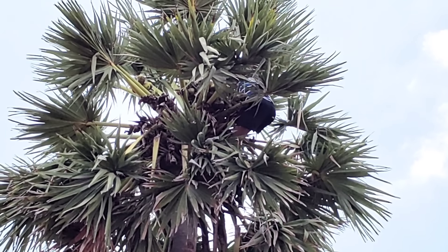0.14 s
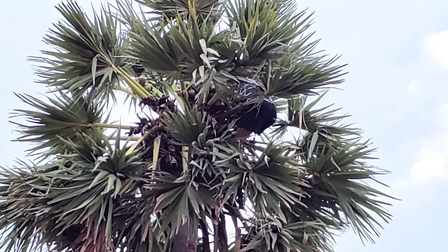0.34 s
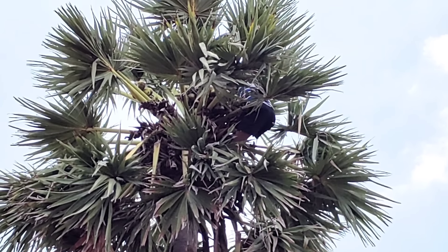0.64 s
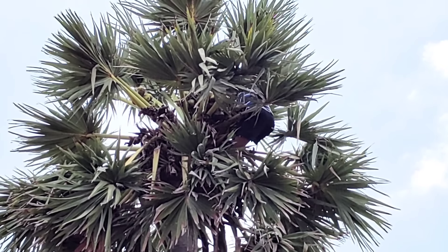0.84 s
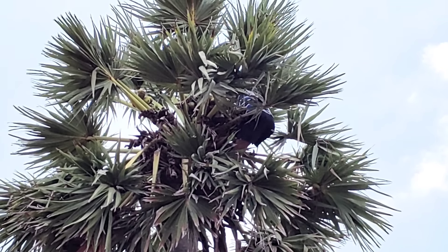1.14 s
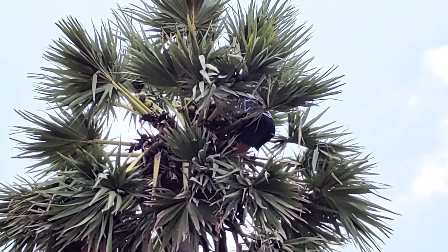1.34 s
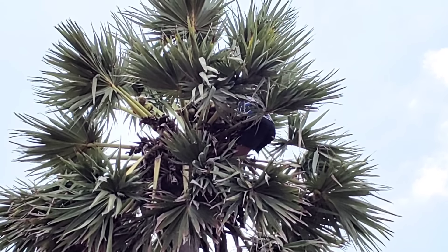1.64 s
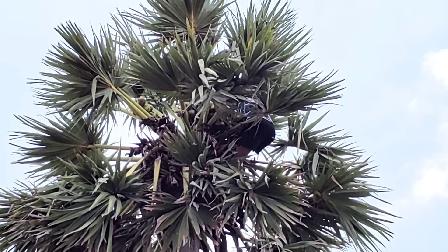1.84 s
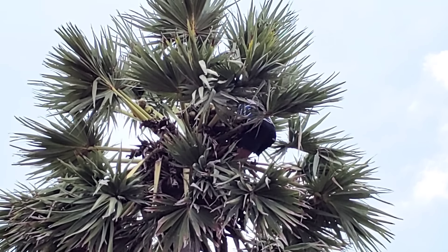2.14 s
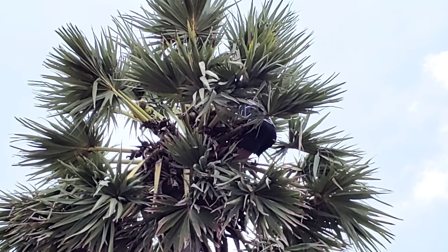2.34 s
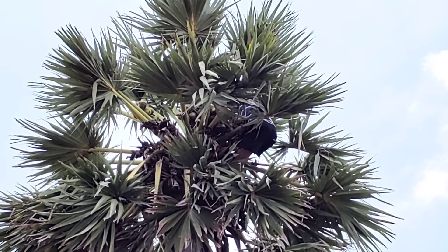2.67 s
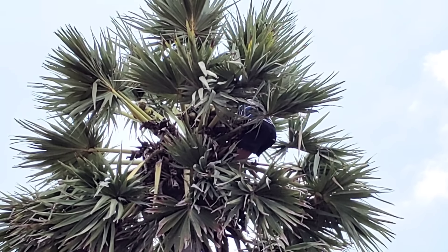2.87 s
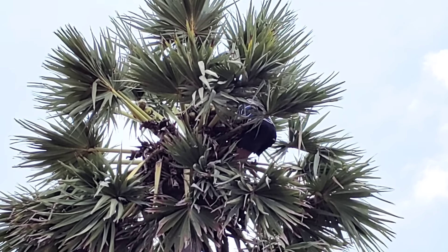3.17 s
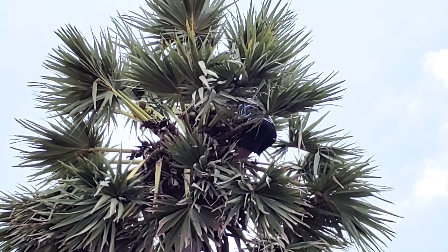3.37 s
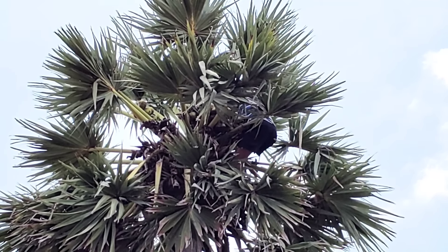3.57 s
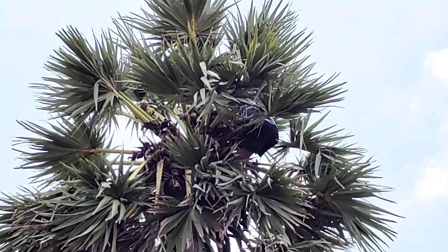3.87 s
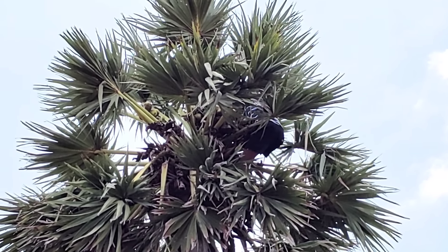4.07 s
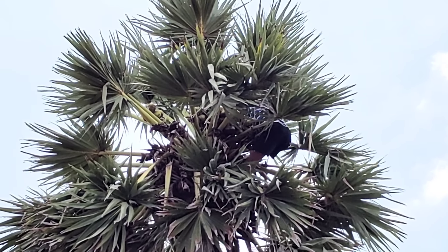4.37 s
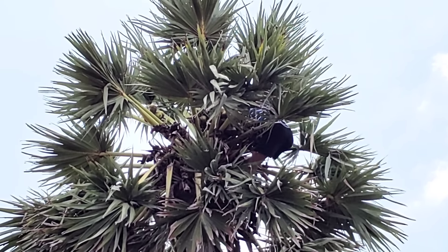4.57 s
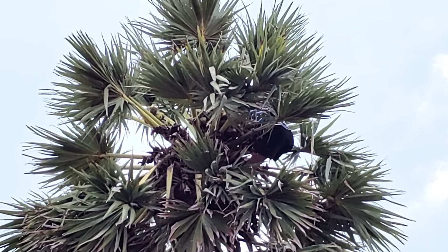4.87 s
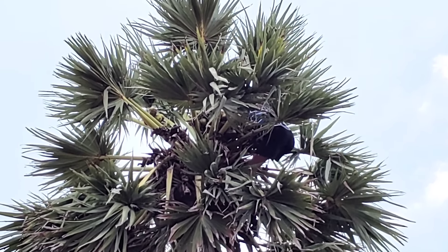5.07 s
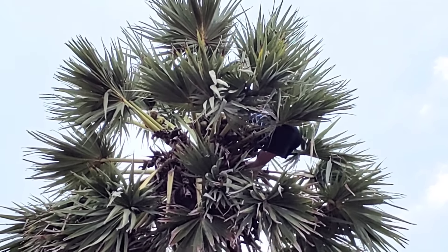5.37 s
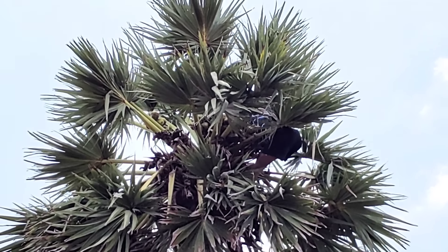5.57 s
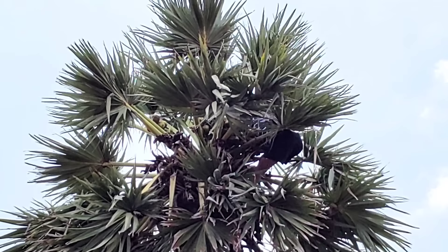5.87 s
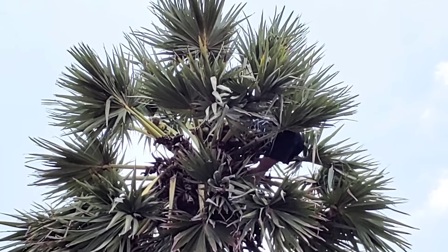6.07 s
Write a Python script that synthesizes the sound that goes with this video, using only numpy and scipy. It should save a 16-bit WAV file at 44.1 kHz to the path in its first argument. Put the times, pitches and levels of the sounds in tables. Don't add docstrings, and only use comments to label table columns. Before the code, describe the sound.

Outdoors, stiff palm leaves snap and hollow stalks knock over a faint fading breeze and hiss, ending in a loud, crackling leaf thrash.

```python
import sys
import numpy as np
from scipy import signal
from scipy.fft import rfft, irfft
from scipy.io import wavfile
from scipy.ndimage import uniform_filter1d

SR = 44100
rng = np.random.default_rng(int(sys.argv[2]) if len(sys.argv) > 2 else 0)


def elevation(decibels):
    levels = np.asarray(decibels, float)
    return 10 ** (levels / 20)


def store_wav(level_fs):
    pcm = np.round(np.clip(np.atleast_2d(level_fs), -1, 1) * 32767)
    wavfile.write(sys.argv[1], SR, pcm.T.astype(np.int16))


N = 273861
HZ = np.arange(N // 2 + 1) * SR / N


def band(x, lo_hz, hi_hz):
    return signal.sosfilt(signal.butter(2, [lo_hz, min(hi_hz, .45 * SR)], "band", fs=SR, output="sos"), x)


def unit(x):
    return x / np.sqrt(np.mean(x ** 2))


def along(table, hz):
    points_hz, values = np.array(table)[:, 0], np.array(table)[:, 1]
    return np.interp(np.log(hz + 1), np.log(points_hz), values)


def curves(table):
    s, *columns = np.transpose(table)
    return [np.interp(np.arange(N) / SR, s, column) for column in columns]


def walk(rate):
    hold = int(SR / rate)
    steps = np.repeat(rng.standard_normal(N // hold + 1), hold)
    return 1.3 * uniform_filter1d(uniform_filter1d(steps, hold), hold)[:N]


def sides(pan_db):
    return elevation(np.array([pan_db, -pan_db]) / 2)


def add(out, s, x):
    i = int(s * SR)
    out[:, i:i + x.shape[1]] += x[:, :N - i]


def split(spectrum, low_hz, high_hz):
    low = 1 / (1 + (HZ / low_hz) ** 4)
    high = 1 - 1 / (1 + (HZ / high_hz) ** 12)
    return [irfft(spectrum * share, N) for share in (low, 1 - low - high, high)]


def patchy(x, depth_db, count_hz, count_s):
    spectra = signal.stft(x, nperseg=256)[2]
    chance = rng.standard_normal(spectra.shape[1:])
    chance = uniform_filter1d(chance, size=count_hz, axis=0)
    chance = unit(uniform_filter1d(chance, size=count_s, axis=1))
    chance[:3] *= .3
    return signal.istft(spectra * elevation(depth_db * chance), nperseg=256)[1][:, :N]


# pitch_hz, level_db (per Hz)
BACKGROUND_COLOUR = [(18, -37), (30, -19), (108, -1.5), (270, -3.5), (379, -10), (709, -11.5), (1500, -17),
                     (3780, -21.5), (4910, -28), (6540, -26.5), (8000, -35.5), (10150, -38), (10600, -24.5),
                     (15500, -23)]
# time_s, level_db (over calm)
BREEZE_LEVEL = [(0, 4.5), (.65, 4.5), (.9, 4), (1.1, 0.5), (1.5, 2), (2, -1), (2.5, 3), (2.9, -1),
                (3.9, -1), (4.4, 1.5), (5, -1.5)]
AIR_DB = -68.5
HUM_DB, HUM_SHARE, HISS_SHARE = 1, .7, 0.49
SETTLE_DB, SETTLE_S = 6, 0.29


def air():
    noise = irfft(elevation(along(BACKGROUND_COLOUR, HZ)) * rfft(rng.standard_normal((2, N))), N)
    hum, far, hiss = split(rfft(unit(noise)), 470, 6500)
    breeze_db = curves(BREEZE_LEVEL)[0]
    settle_db = SETTLE_DB * np.exp(-np.arange(N) / SR / SETTLE_S)
    still = elevation(HUM_DB + HUM_SHARE * breeze_db) * hum
    still += elevation(breeze_db) * far
    still += elevation(HISS_SHARE * breeze_db + settle_db) * hiss
    return elevation(AIR_DB + 4.5) * patchy(still, depth_db=2.44, count_hz=5, count_s=16)


# time_s, level_db
TRILL_LEVEL = [
    (0.0, -59),
    (0.008, -60),
    (0.042, -70.5),
    (0.066, -63),
    (0.1, -79),
]
# pitch_hz, width_hz, level_db
TRILL_THROAT = [(7140, 386, -1.5), (4330, 410, -12), (6000, 410, -11.5), (8050, 1000, -12)]
TRILL_HZ = 117


def trill(duty=0.97):
    phase = np.cumsum(TRILL_HZ * (1 + 0.073 * walk(40))) / SR % 1
    breath = rng.standard_normal(N) + 2.0 * rng.standard_normal((2, N))
    puffs = np.exp(-phase / duty) * breath
    buzz = unit(sum(elevation(db) * band(puffs, hz - w / 2, hz + w / 2) for hz, w, db in TRILL_THROAT))
    sounding = np.arange(N) < TRILL_LEVEL[-1][0] * SR
    return buzz * elevation(curves(TRILL_LEVEL)[0] + 6) * sides(7.3)[:, None] * sounding


HOLD_S, FALL_BEND = .025, 1.4
SWELL_DB_PER_KHZ, FADE_DB = 9, 15
LEFT_HZ, COMB_HZ, COMB_PAN_DB = 6250, 1020, 12
THROAT_HZ, THROAT_WIDTH_HZ, THROAT_DB = 6310, 130, 6


def whistle(notes, lag_s, comb_db, rough_db=2.1):
    out = np.zeros((2, N))
    for s, fall_s, first_hz, last_hz, db in notes:
        t = np.arange(int((fall_s + HOLD_S) * SR)) / SR
        above = (first_hz - last_hz) * np.maximum(1 - t / fall_s, 0) ** FALL_BEND
        hz = last_hz + above
        level_db = db - SWELL_DB_PER_KHZ * above / 1000
        level_db -= FADE_DB * np.maximum(t - fall_s, 0) / HOLD_S
        level_db += THROAT_DB * np.exp(-((hz - THROAT_HZ) / THROAT_WIDTH_HZ) ** 2)
        level_db += rough_db * walk(163)[:len(t)]
        phase = 2 * np.pi * (np.cumsum(hz) / SR - np.outer([0, lag_s], hz))
        comb = np.tanh(2 * np.cos(2 * np.pi * (hz - LEFT_HZ) / COMB_HZ))
        gain = np.sqrt(2) * elevation(level_db) * signal.windows.tukey(len(t), .15)
        add(out, s, gain * sides(comb_db * comb) * np.sin(phase))
    return out


# start_s, fall_s, first_hz, last_hz, peak_db
NEAR_WHISTLES = [
    (1.397, .066, 7350, 6230, -61.5),
    (1.602, .05, 6200, 5440, -70),
    (4.031, .074, 7120, 6330, -62.5),
    (4.243, .052, 5920, 5230, -69),
]
# start_s, fall_s, first_hz, last_hz, peak_db
FAR_WHISTLES = [
    (2.415, .115, 3050, 3045, -83),
    (2.592, .06, 3510, 3495, -82),
]


def birds(echo_db=-12.0, echo_t60=0.85):
    song = whistle(NEAR_WHISTLES, 1.155e-3, COMB_PAN_DB)
    song += whistle(FAR_WHISTLES, 2e-5, comb_db=-10.0) + trill()
    t = np.arange(SR // 2) / SR
    scatter = rng.standard_normal((2, len(t))) * elevation(-60 * t / echo_t60) * (t > .03)
    scatter /= np.sqrt(np.sum(scatter ** 2) / 2)
    flutter = walk(900)
    return song + elevation(echo_db) * flutter * signal.fftconvolve(song, scatter, axes=1)[:, :N]


def snaps(per_s=9000, scatter_db=.6, smear=1.6):
    hits = rng.random(N) < per_s / SR
    clicks = hits * rng.standard_normal(N) * elevation(scatter_db * rng.exponential(size=N))
    return unit(clicks) + smear * rng.standard_normal(N)


# pitch_hz, level_db (per Hz)
SNAP_COLOUR = [(24, -53), (45, -9), (103, -6), (400, -11.5), (522, -8), (1020, -6.5), (2270, -5),
               (5000, -7), (8200, -8), (9500, -12.5), (10050, -14.5), (10450, -8.5), (12000, -4.5),
               (15500, -16)]
# pitch_hz, width_hz, level_db
LEAF_RINGS = [(1020, 81, -2), (1449, 30, 2.5), (2292, 130, -0.5), (2785, 77, -6.5), (2940, 8.3, -31),
              (3610, 300, -11.5), (4508, 80, -6), (4870, 51, -72), (6237, 31, -6.5)]
# pitch_hz, likeness (-1 to 1, no unit)
LEAF_LIKENESS = [(60, -0.22), (150, 0.37), (300, 0.98), (900, 0.91), (1400, 0.15), (3000, 0.39),
                 (5500, 0.099), (7000, -0.23), (15000, -0.36)]


def leaf_grain(modes_db=5):
    ring = sum(elevation(db) / (1 + (2 * (HZ - f) / w) ** 2) for f, w, db in LEAF_RINGS)
    colour = elevation(along(SNAP_COLOUR, HZ)) * (1 + elevation(modes_db) * ring)
    alike = np.clip(along(LEAF_LIKENESS, HZ), -1, 1)
    mid = rfft(snaps()) * np.sqrt(1 + alike)
    side = rfft(snaps()) * np.sqrt(1 - alike)
    return colour * np.array([mid + side, mid - side])


RINGING_TREBLE_DB, CRISP_RING_HZ, CRISP_RING_DB = -19, 1050, -16


def kinds(ringing, crisp):
    rows = [(s, db, hz, ring_db, RINGING_TREBLE_DB, t60) for s, db, hz, ring_db, t60 in ringing]
    return rows + [(s, db, CRISP_RING_HZ, CRISP_RING_DB, treble_db, t60) for s, db, treble_db, t60 in crisp]


def cracks(table, body, treble, rise_s, crest_db, ring_q, hold, tick_db):
    out, t = np.zeros((2, N)), np.arange(SR // 3) / SR
    tick = 1 + elevation(tick_db - 60 * t / 0.016)
    for s, db, hz, ring_db, treble_db, t60 in table:
        i = int(s * SR)
        n = min(len(t), N - i)
        fade_db = 60 * (t / max(t60, .004)) ** hold
        shape = ((1 - np.exp(-t / rise_s)) * elevation(db - crest_db - fade_db))[:n]
        burst = body[:, i:i + n]
        patch = unit(band(burst, hz * (1 - .5 / ring_q), hz * (1 + .5 / ring_q)))
        bright = elevation(treble_db) * tick[:n] * treble[:, i:i + n]
        out[:, i:i + n] += shape * (burst + elevation(ring_db) * patch + bright)
    return out


EFFORT_DB = -38


def follow(effort_db, db, lag_s, power):
    keep = np.exp(-1 / (max(lag_s, .001) * SR))
    late = signal.lfilter([1 - keep], [1, -keep], elevation(effort_db - EFFORT_DB))
    return elevation(EFFORT_DB + db) * late ** power


# start_s, length_s, level_db
STALK_JOLTS = [
    (5.084, 0.031, -62),
    (5.234, 0.046, -56),
    (5.323, 0.074, -54),
    (5.693, .05, -56),
    (5.756, 0.027, -58),
    (6.025, 0.07, -48),
    (6.085, 0.082, -40.5),
    (6.148, 0.067, -43.5),
]


def jolts():
    out = np.zeros((1, N))
    for s, length_s, db in STALK_JOLTS:
        add(out, s, elevation(db) * signal.windows.tukey(int(length_s * SR), .7)[None])
    return out


# time_s, level_db
PULL_EFFORT = [
    [(5.0, -71.5), (5.1, -62), (5.108, -43), (5.182, -43), (5.188, -34), (5.31, -39), (5.33, -33.5),
     (5.392, -34), (5.418, -41)],
    [(5.532, -43.5), (5.54, -40.5), (5.68, -41), (5.79, -49), (5.93, -50.5)],
    [(6.01, -37), (6.08, -31), (6.126, -28), (6.15, -34), (6.21, -33.5)],
]
# start_s, peak_db, ring_hz, ring_db, t60_s
RINGING_CRACKS = [(0.001, -65, 4320, 4, 0.085), (0.108, -45, 1115, -1.5, 0.069),
                  (0.227, -54.5, 1420, -2, 0.074), (0.509, -63, 1050, 0, 0.032), (0.62, -60, 840, 5, 0.06),
                  (0.659, -56, 1000, 3, 0.044), (0.69, -64.5, 1020, 6, 0.12), (1.144, -66, 736, 12, 0.026),
                  (1.277, -68, 1070, 12, 0.031), (2.163, -64, 890, -2, 0.04), (3.769, -61, 960, 3, 0.05),
                  (3.968, -62, 840, 0, 0.027), (4.544, -61.5, 736, 5, 0.089), (4.561, -51, 980, -7, 0.086)]
# start_s, peak_db, treble_db, t60_s
CRISP_CRACKS = [
    (0.14, -44.5, -0.5, 0.081),
    (0.486, -55, -2.5, 0.033),
    (0.733, -59.5, -1, 0.044),
    (0.896, -48.5, -18, 0.034),
    (1.319, -59, -19, 0.14),
    (2.368, -64, -30, 0.058),
    (4.071, -57.5, -33, 0.19),
    (4.664, -48, -8, 0.11),
    (4.719, -56.5, -16, 0.165),
]
# start_s, peak_db, ring_hz, ring_db, t60_s
RINGING_THRASHES = [(5.062, -50, 1000, -3, 0.067), (5.083, -36.5, 1000, -2, 0.039),
                    (5.107, -34.5, 1120, -1, 0.048), (5.186, -32, 2730, 4, 0.053),
                    (5.272, -29, 940, 1.5, 0.059), (5.327, -25.5, 4400, 1.5, 0.052),
                    (5.383, -50, 950, 9, 0.36), (5.46, -44.5, 590, 13, 0.08), (5.539, -30, 990, -13, 0.056),
                    (5.627, -35.5, 1040, 1, 0.042), (5.903, -32, 1010, -4, 0.035),
                    (5.942, -48.5, 3900, 17, 0.04), (6.124, -22, 1020, -5, 0.15)]
# start_s, peak_db, treble_db, t60_s
CRISP_THRASHES = [
    (5.223, -28.5, -18, 0.15),
    (5.254, -42.5, -21, 0.06),
    (5.364, -25.5, 3.5, 0.038),
    (6.015, -28, -15, 0.082),
    (6.084, -22.5, -1.5, 0.043),
    (6.114, -17.5, -2.5, 0.043),
    (6.176, -22.5, -11, 0.073),
]
TIPS_DB, TIPS_LAG_S, TIPS_POWER = -7.5, 0.01, 1.47
STALK_DB, STALK_LAG_S, STALK_POWER = -16.5, 0.031, 0.51


def fronds():
    stalk, body, treble = map(unit, split(leaf_grain(), 490, 8260))
    before_pulls = np.arange(N) < PULL_EFFORT[0][0][0] * SR
    effort_db = curves(sum(PULL_EFFORT, []))[0] - 200 * before_pulls
    slips = elevation(1.22 * walk(60) + 0.51 * walk(350))
    drag = elevation(effort_db) * body
    drag += follow(effort_db, TIPS_DB, TIPS_LAG_S, TIPS_POWER) * treble
    sway = follow(effort_db, STALK_DB, STALK_LAG_S, STALK_POWER) * elevation(1.6 * walk(16))
    drag += (sway + jolts()) * stalk
    small = cracks(kinds(RINGING_CRACKS, CRISP_CRACKS), body, treble,
                   rise_s=.001, crest_db=11.5, ring_q=6, hold=2.2, tick_db=15)
    large = cracks(kinds(RINGING_THRASHES, CRISP_THRASHES), body, treble,
                   rise_s=.0007, crest_db=13, ring_q=4, hold=1.8, tick_db=0)
    return patchy(slips * drag + small + large, depth_db=2.0, count_hz=3, count_s=5)


def knock(table, rise_s, over, over_db):
    out, t = np.zeros((2, N)), np.arange(SR // 3) / SR
    for s, db, hz, t60, pan_db in table:
        fade = elevation(-60 * t / max(t60, .01))
        tone = np.sin(2 * np.pi * hz * t)
        tone += elevation(over_db) * fade * np.sin(2 * np.pi * over * hz * t)
        add(out, s, np.outer(sides(pan_db), elevation(db) * (1 - np.exp(-t / rise_s)) * fade * tone))
    return out


# start_s, peak_db, pitch_hz, t60_s, left_minus_right_db
RIB_TOCKS = [
    (.143, -43, 1140, .075, 3),
    (.228, -55, 1430, .06, 0),
]
# start_s, peak_db, pitch_hz, t60_s, left_minus_right_db
STALK_KNOCKS = [(0.73, -50.5, 307, 0.14, 1), (2.521, -37, 281, 0.043, -1), (2.527, -45, 259, 0.085, -2),
                (2.572, -45, 123, 0.058, 2), (2.598, -51, 263, 0.054, 3), (3.654, -47.5, 151, 0.06, 3),
                (3.699, -45, 134, 0.05, 9), (3.727, -45.5, 137, 0.081, 0), (3.757, -49, 118, 0.079, 3),
                (4.688, -64, 210, 0.084, 4), (4.717, -54, 111, 0.11, 10), (4.739, -53, 104, 0.045, 27)]
# start_s, peak_db, pitch_hz, t60_s, left_minus_right_db
FIBRE_THUDS = [
    (2.158, -48, 456, 0.078, -1.5),
    (2.165, -45, 600, 0.064, 8),
    (2.179, -56, 430, 0.091, 9),
    (2.212, -53, 454, 0.062, 0.5),
    (2.227, -60, 600, 0.05, -1.5),
]
# start_s, peak_db, left_minus_right_db
BLADE_TICK = [
    (2.5634, -42.5, 13.5),
]
# pitch_hz, level_db, t60_s
BLADE_TONES = [(2800, 6.5, 0.014), (1200, -8.5, 0.027), (1440, -6, 0.02), (1900, -17, .025)]


def stalks(rough=.4):
    hollow = knock(STALK_KNOCKS, rise_s=0.0029, over=1.68, over_db=-5) * (1 + rough * walk(280))
    hollow += knock(FIBRE_THUDS, rise_s=.002, over=1.9, over_db=-4) * (.6 + .6 * walk(1100))
    out = band(hollow, 75, 2500) + knock(RIB_TOCKS, rise_s=0.0047, over=2.8, over_db=-25)
    t = np.arange(SR // 3) / SR
    for s, db, pan_db in BLADE_TICK:
        tick = sum(elevation(g - 60 * t / t60) * np.sin(2 * np.pi * f * t) for f, g, t60 in BLADE_TONES)
        add(out, s, np.outer(sides(pan_db), elevation(db - 3.5) * (1 - np.exp(-t / 0.00068)) * tick))
    return out


def scene():
    return air() + birds() + fronds() + stalks()


def band_limit(x):
    return signal.sosfilt(signal.butter(12, 15680, fs=SR, output="sos"), x)


# pitch_hz, left_minus_right_db
MICROPHONE_TILT = [(60, 3), (110, -1.5), (200, -2), (380, -1.5), (700, 0), (1290, -1), (2380, -1.0),
                   (4400, -1.5), (8120, -1.5), (15000, 0.5)]


def record(dry):
    microphones = sides(along(MICROPHONE_TILT, HZ)) / (1 + (HZ / 15250) ** 120)
    mix = irfft(rfft(dry) * microphones, N)
    return band_limit(mix)


dry = scene()
out = record(dry)
store_wav(out)
```